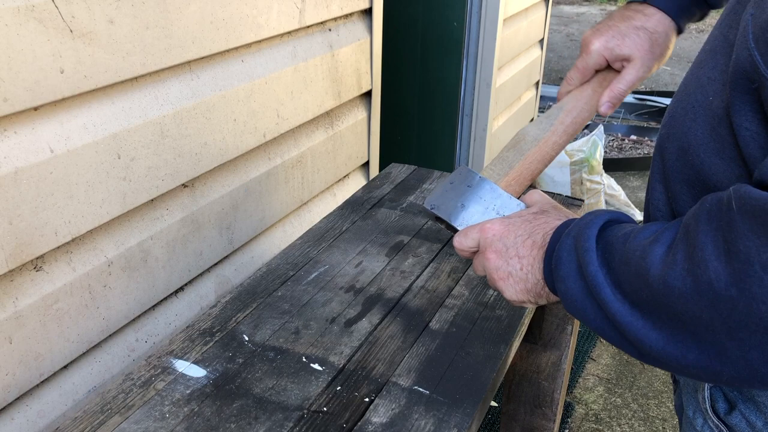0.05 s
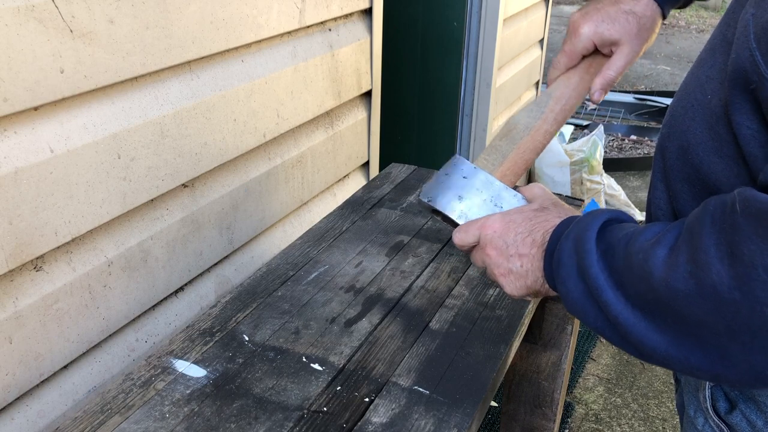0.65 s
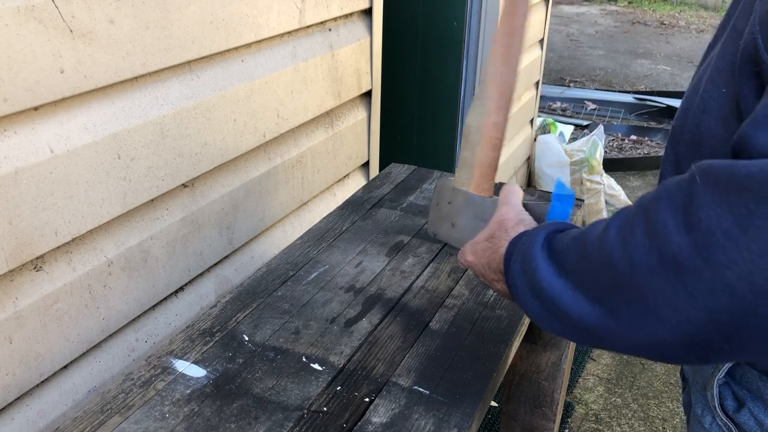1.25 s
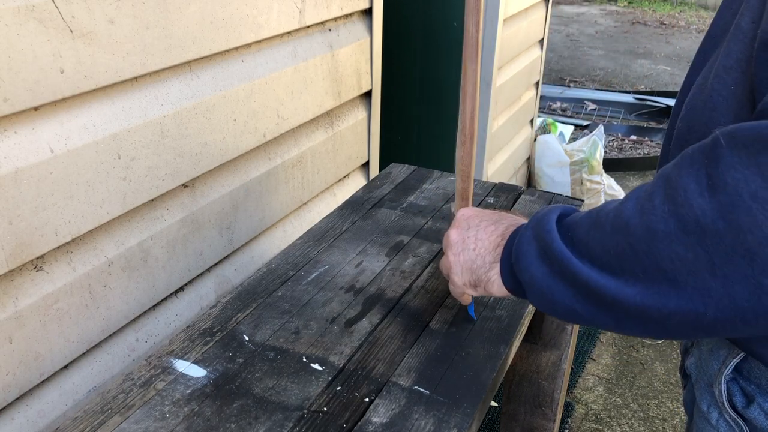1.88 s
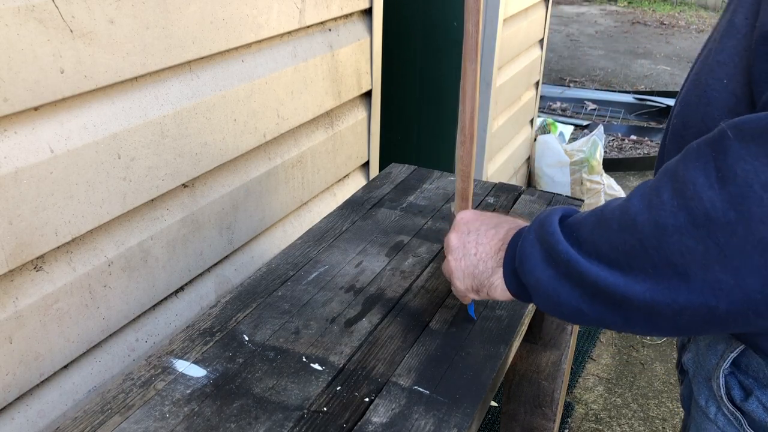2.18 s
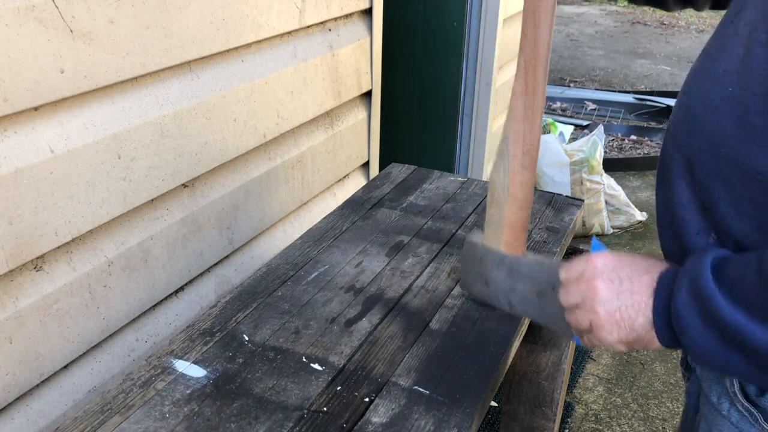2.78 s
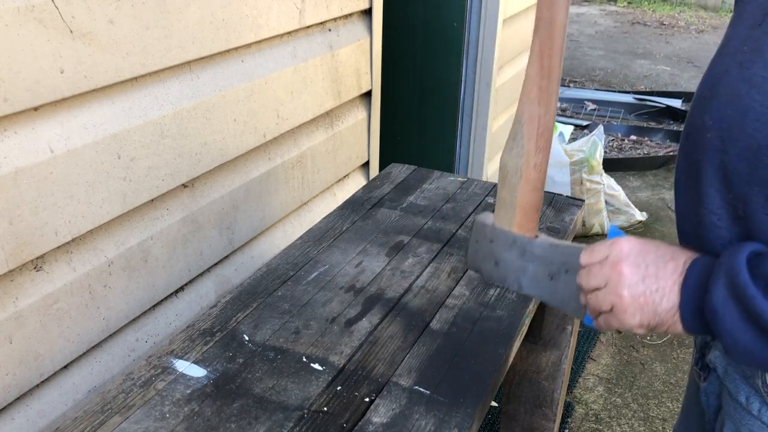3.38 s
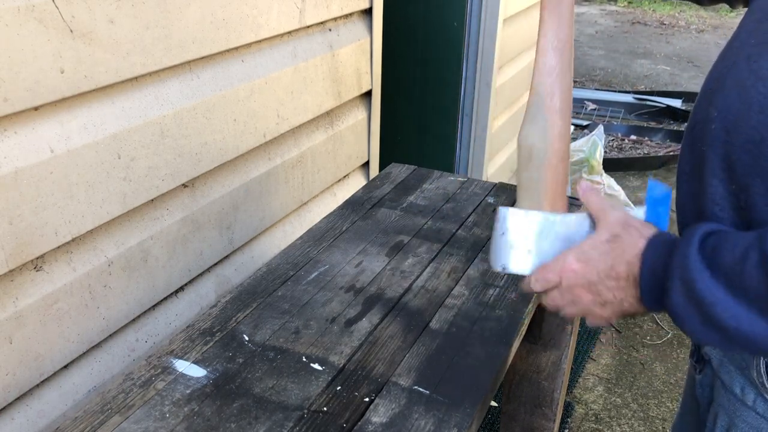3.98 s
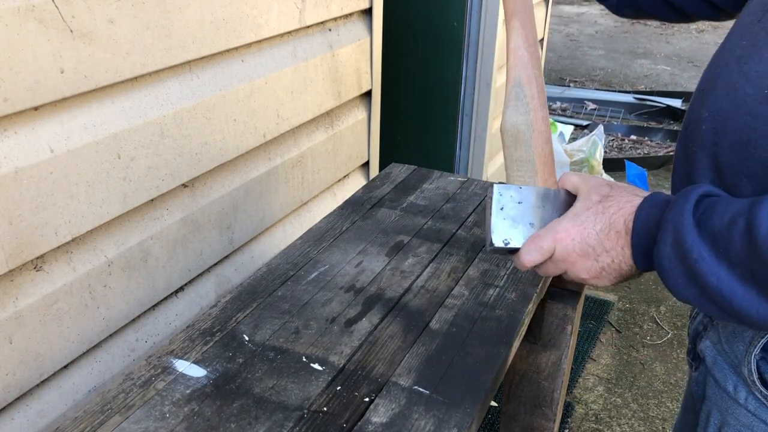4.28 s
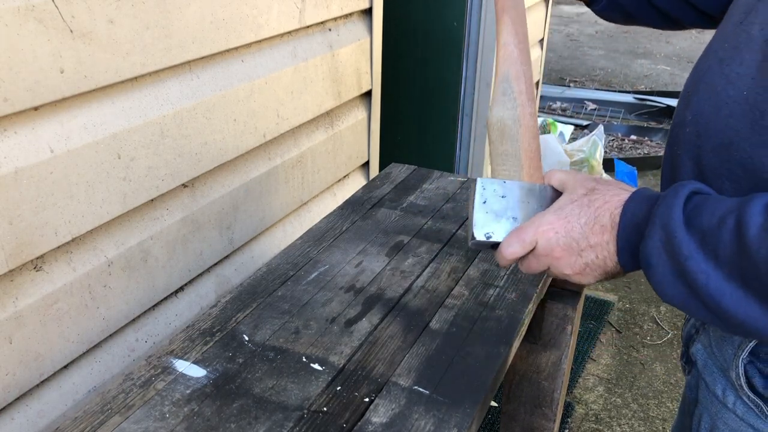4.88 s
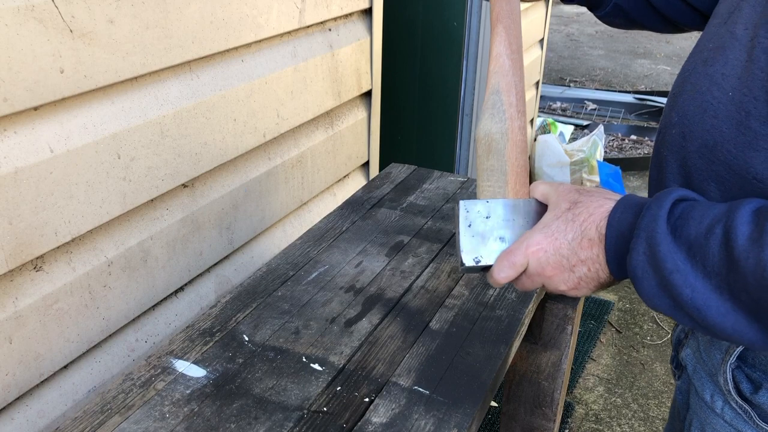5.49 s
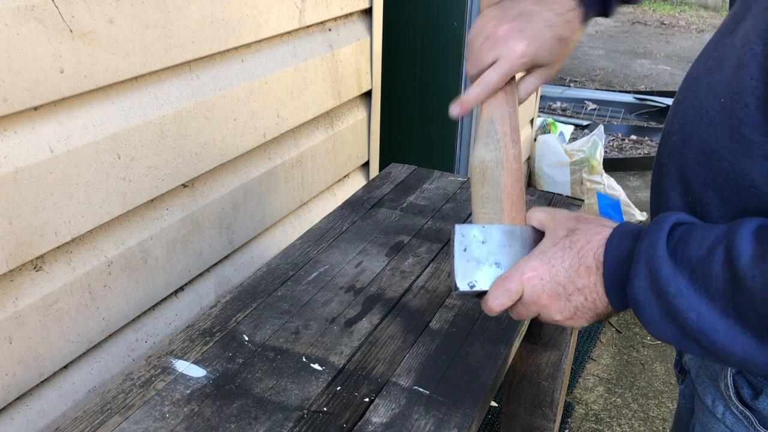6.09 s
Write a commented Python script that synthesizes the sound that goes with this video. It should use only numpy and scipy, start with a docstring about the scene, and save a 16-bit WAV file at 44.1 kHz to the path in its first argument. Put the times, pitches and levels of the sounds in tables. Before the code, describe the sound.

A low, steady hush of outdoor air and very faint, distant birds runs throughout. Close by, a sleeve brushes softly at about 0.7 seconds, and a palm slides on a wooden axe handle with a tiny squeak near 1.3. At 1.6 seconds the steel axe head lands on a plank bench with a dull, hollow thud. A second, slightly brighter knock comes at 2.8 seconds. Two hard, sharp knocks follow at 3.2 and 3.5, each with a quick rattling bounce and small metallic clicks. The knocks are by far the loudest sounds; each makes the wood ring briefly and leaves a short echo from the yard. From 3.8 seconds until the end, just after 6, hands and sleeves rub faintly along the handle, with a few light bumps and ticks between 4.9 and 5.6 and another tiny squeak near 5.1.

```python
"""Axe knocks on a bench

A steel axe head on a wooden handle is knocked four times on a weathered plank bench by a house wall.
Each blow sends a bending wave along the plank, high notes first, and makes the bench ring; the head
bounces and clicks. In between, hands and sleeves rub the handle, over quiet air and a few far birds."""
import sys
import numpy as np
from scipy import signal
from scipy.fft import rfft, irfft
from scipy.io import wavfile
from scipy.ndimage import uniform_filter1d, minimum_filter1d

SR = 44100
rng = np.random.default_rng(int(sys.argv[2]) if len(sys.argv) > 2 else 0)


def wav_out(sig):
    """Save sig, one row per channel (or a flat mono array), as 16-bit PCM at SR to the path in sys.argv[1]."""
    wavfile.write(sys.argv[1], SR, np.round(np.clip(np.atleast_2d(sig).T, -1, 1) * 32767).astype(np.int16))


N = 275625

# the four knocks; sound above hardness_hz is dulled:
# start_s, force_db, hardness_hz, ring_db, scatter_db, spot
BLOWS = [(1.6420, 7, 300, -3, -8, "middle"), (2.8333, 5, 750, 1, -15.5, "outer"),
         (3.2142, 4, 4790, 1, -5, "edge"), (3.4967, 5.5, 4900, 1.5, -2, "corner")]
# the head drops back on the spot last struck: start_s, force_db, ring_db
BOUNCES = [(1.6806, -24, -21.5), (2.8478, -7, -12), (3.2305, 0.5, -8), (3.2390, 1, -13.5),
           (3.2545, -0.5, -8.5), (3.2640, 7.5, -4), (3.5130, 2, 9.5), (3.521, 3.5, -6), (3.5333, 4, 1)]
# the resting head nudges the bench as the grip changes: start_s, force_db
NUDGES = [(4.871, -35.5), (5.068, -35), (5.5553, -45)]
# for each named spot, the travel time of a wave near 1 kHz and the pitch where the plank gives most:
# delay_s, give_hz, give_db, width_octaves
SPOTS = {"middle": (0.00162, 180.6, 18, 0.42), "outer": (0.0017, 330, 2.1, 0.83),
         "edge": (0.00146, 1200, 4.7, 0.078), "corner": (0.001367, 1400, 6.25, 0.21)}
# the bench's own notes and their strength at each spot (fade_s is always the time to drop 60 dB):
# pitch_hz, fade_s, middle_db, outer_db, edge_db, corner_db
BENCH_NOTES = [(79.3, 0.6, -33.5, -52.5, -57, -60), (100.8, 0.074, -88, -59.5, -17, -23.5),
               (131.6, 0.17, -25.5, -39, -34.5, -29), (175.9, 0.15, -18, -24, -27.5, -33.5),
               (190, .12, -60, -26.5, -31.5, -34), (311, 0.15, -34, -21, -24, -29.5),
               (367, 0.15, -27, -37, -21, -34), (438, 0.099, -22, -18.5, -31.5, -27.5),
               (507, 0.27, -39, -36, -29, -31), (463, 0.047, -18, -26, -28.5, -20.5),
               (584, 0.084, -24, -31, -24, -20), (603, 0.16, -65, -28.5, -18, -28.5),
               (685, 0.053, -50, -28.5, -26.5, -20.5), (820, 0.088, -33, -50.5, -36, -43),
               (890, 0.18, -72, -48, -32.5, -31.5), (923.6, .11, -48, -31.5, -34.5, -24),
               (939, 0.21, -45, -39.5, -31, -25.5), (1240, 0.12, -69, -48.5, -36.5, -42),
               (1219, 0.049, -25.5, -45, -38.5, -41), (1310, 0.1, -61, -63.5, -31.5, -37),
               (1395, 0.15, -80, -49.5, -38.5, -37), (1540, 0.086, -71, -55.5, -41.5, -33.5),
               (1530, 0.24, -65, -60.5, -45, -41), (1760, 0.076, -50, -47.5, -42.5, -41.5)]
# tone of the first bending wave: pitch_hz, level_db
WAVE_TONE = [(50, -5.5), (150, 13), (250, 5.5), (350, 21.5), (580, 26), (810, 14), (1000, 22), (1290, 25.5),
             (1600, 16), (2000, 18), (3000, 10.5), (5000, 2.5), (8500, 3.5), (16000, -10.5)]
# the stiff handle's notes, brought out by a hard hit: pitch_hz, level_db, fade_s
HANDLE_NOTES = [(1705, -30, 0.079), (2020, -41.5, .07), (2070, -36.5, 0.099), (2390, -39.5, 0.065),
                (2647, -36, 0.072), (3140, -40.5, 0.093), (3420, -49, 0.12), (3450, -44, 0.22),
                (5170, -47, 0.076)]
# waves scattered by plank ends and joints: pitch_hz, level_db, fade_s
PLANK_ECHOES = [(30.2, 2.5, .2), (58.6, 17.5, 0.19), (116, 16, 0.087), (245, 8, 0.095), (550.5, 24.5, .16),
                (780, 15.5, 0.16), (1320, 22, 0.093), (1950, 10, 0.21), (3070, 1, 0.22), (5000, -2.5, 0.26),
                (8010, 2.5, 0.17), (10840, -4.5, 0.24), (16000, -6.5, 0.22)]
# echoes from the yard: pitch_hz, level_db, fade_s
YARD_ECHOES = [(30, -17.5, .7), (69.67, -3, 1), (250, 0.5, 0.875), (550, 8, 0.62), (1003.5, 12.5, 0.47),
               (1510, 11.5, 0.47), (2120, -4, 0.55), (4005, -13.5, .5), (11990, -26.5, .35)]
# sharp clicks of the steel head: start_s, level_db
CLICKS = [(1.682, -49.5), (2.8585, -43.5), (3.2569, -32.5), (3.2793, -44), (3.3008, -42), (3.5608, -39),
          (3.74, -48.5), (5.1682, -58), (5.556, -50.5)]
# tone of a click: pitch_hz, level_db
CLICK_TONE = [(500, -6), (1800, 5), (4000, -6), (4800, -2), (6000, 0.5), (8500, -8), (10500, -13.5),
              (16000, -20.5)]
# the steel head's own notes: pitch_hz, level_db, fade_s
STEEL_NOTES = [(3530, -20, 0.11), (3750, -20.5, .05), (6030, -16.5, 0.031)]
# a palm slides along the handle: middle_s, length_s, level_db, skin_share (0 all cloth, 1 all skin)
RUBS = [(1.26, 0.29, -69.5, 0.89), (1.886, 0.19, -77.5, 0.94), (2.319, 0.12, -63.5, 0.99),
        (3.791, 0.11, -62.5, 1), (4.225, 0.22, -60, 0.83), (5.68, 0.3, -62, 0.93),
        (6.094, 0.2, -64.5, 0.61)]
# a sleeve brushes past: middle_s, level_db
BRUSHES = [(0.664, -64), (0.781, -63), (4.645, -60), (4.86, -60), (5.07, -62.5), (5.152, -65.5),
           (5.216, -62), (5.4, -69), (5.57, -70.5)]
# bright hiss of skin: pitch_hz, level_db
SKIN_TONE = [(800, -7), (2000, -16.5), (4000, -0.5), (6500, -1), (10000, -2), (15500, -6)]
# dull rustle of cloth: pitch_hz, level_db
CLOTH_TONE = [(300, 1.5), (1000, 1), (1900, 5), (4200, -3), (6500, -9), (10000, -15), (16000, -31)]
# narrow bands that the rubbed axe makes louder: pitch_hz, width_hz, boost_db
RUB_PEAKS = [(1860, 89, -1), (2565, 67, 9), (3257, 64, 11), (4180, 56, 10), (4940, 120, 4.5),
             (5500, 120, 3.5)]
# the palm squeaks on the handle: start_s, length_s, first_hz, last_hz, level_db, wobble_share, octave_db
SQUEAKS = [(1.251, 0.094, 2000, 2870, -62.5, 0.063, -4), (5.074, 0.087, 5480, 5300, -65, 0.095, -24)]
# the clearest far bird notes: start_s, length_s, first_hz, last_hz, level_db
BIRD_NOTES = [(.25, .26, 4390, 4490, -80.5), (1.68, 0.14, 5760, 6260, -74.5),
              (1.884, .2, 4440, 4280, -72.5), (1.919, 0.194, 3440, 3480, -70.5),
              (2.618, 0.094, 5600, 5210, -77), (3.02, 0.16, 5480, 5130, -72),
              (4.72, 0.089, 2820, 2770, -75), (6.08, .15, 3970, 3820, -78)]
# tone of the farthest birds, blurred into a chorus: pitch_hz, level_db
CHORUS_TONE = [(1200, -39.5), (2500, -2), (4000, 0.5), (5500, -4.5), (7000, -10), (9500, -32)]
# how the chorus swells and sinks: time_s, change_db
CHORUS_SWELL = [(0, -1.5), (2.098, 5), (3.1, 4), (4.3, -3.5), (6.25, -10)]
# tone of the outdoor air: pitch_hz, level_db
AIR_TONE = [(22, -33.5), (38, 1), (81, 0), (145, -10.5), (295, -10), (464, -14.5), (645, -12.5),
            (751, -15.5), (919, -13.5), (1100, -16), (3250, -31), (4750, -33), (5820, -35.5),
            (14500, -42.5), (16000, -56.5)]


def knocks(steepness=2.19):
    """Each knock makes a falling chirp in the plank, a clack in the handle, echoes and a ringing bench."""
    out, hz = np.zeros(N), bins(SR)
    clack = rfft(ringing(HANDLE_NOTES, SR))
    fade = np.minimum(np.linspace(10, 0, SR), 1)  # each hit fades out over its last tenth of a second
    chirp = {spot: bending_wave(spot) for spot in SPOTS}
    ring = {spot: bench_ring(spot) for spot in SPOTS}
    for start_s, force_db, hardness_hz, ring_db, scatter_db, spot in knock_list():
        dulling_db = -20 * np.log10(1 + (hz / hardness_hz) ** steepness)  # a soft touch lacks high notes
        push = amp(force_db) * tone_filter(dulling_db)
        scattered = echoes(PLANK_ECHOES, rise_s=0.0014) + echoes(YARD_ECHOES, rise_s=0.017)
        hit = irfft(push * (chirp[spot] + clack + amp(scatter_db) * scattered))
        add(out, start_s, fade * hit + amp(ring_db) * ring[spot])
    return out


def knock_list(bounce_hz=620, pre_echo_hz=1330, nudge_hz=419.6, hard_hz=2500, pre_echo_gap_s=0.0113):
    """Lists every blow, bounce, pre-echo and nudge, in the columns of BLOWS."""
    rows = list(BLOWS)
    for start_s, force_db, ring_db in BOUNCES:
        last_spot = [spot for blow_s, *_, spot in BLOWS if blow_s < start_s][-1]
        rows.append((start_s, force_db, bounce_hz, ring_db, -3, last_spot))
    for start_s, force_db, hardness_hz, _, _, spot in BLOWS:
        if hardness_hz > hard_hz:  # two faint pre-echoes are heard just before each hard knock
            for k in (1, 2):
                rows.append((start_s - k * pre_echo_gap_s, force_db - 29, pre_echo_hz, -np.inf, -4, spot))
    return rows + [(start_s, force_db, nudge_hz, -42.5, -8, "outer") for start_s, force_db in NUDGES]


def bending_wave(spot):
    """The spectrum (the mix of pitches) of the falling chirp that runs straight from the struck spot."""
    delay_s, give_hz, give_db, width_octaves = SPOTS[spot]
    hz = bins(SR)
    boost_db = give_db * np.exp(-(np.log2((hz + 1) / give_hz) / width_octaves) ** 2)
    lag = np.exp(-2j * np.pi * np.cumsum(travel_time(hz, delay_s)))
    return tone_filter(look_up(WAVE_TONE, hz) + boost_db) * lag


def travel_time(hz, delay_s, power=1.06, slowest_hz=110):
    """Seconds a bending wave takes along the plank: the lower the note, the later it arrives."""
    return delay_s * (1e3 / (hz + slowest_hz)) ** power


def bench_ring(spot, build_s=0.0028):
    """The bench rings with its own notes, each as strong as it moves at the struck spot."""
    t, ring = np.arange(SR) / SR, np.zeros(SR)
    for hz, fade_s, *spot_db in BENCH_NOTES:
        age = np.maximum(t - travel_time(hz, SPOTS[spot][0]), 0)
        build = 1 - np.exp(-age / build_s)  # a note needs a trip along the plank to build up
        strength = amp(spot_db[list(SPOTS).index(spot)])
        ring += strength * build * dying(age, fade_s) * np.sin(2 * np.pi * hz * age)
    return ring


def echoes(table, rise_s):
    """The spectrum of one second of crowded echoes that build up, then fade, each pitch at its own pace."""
    hz, t, bands = signal.stft(rng.standard_normal(SR), SR, nperseg=512)
    fade_s = look_up(table, hz, column=2)[:, None]
    energy = fade_s * SR / np.log(1e6)  # evened out below, so a longer fade adds no energy
    tail = signal.istft(bands * dying(t, fade_s) / np.sqrt(energy), SR, nperseg=512)[1][:SR]
    swell = 1 - np.exp(-(np.arange(SR) / SR / rise_s) ** 2)
    return rfft(tail * swell) * tone_filter(look_up(table, bins(SR)))


def clicks(snap_s=0.0012, after_db=-17, after_s=0.0091, grit_delay_s=0.005, grit_db=-41.5):
    """The steel head clicks, and crushes grit at each blow; the hand keeps its ring short."""
    out, t = np.zeros(N), np.arange(SR // 8) / SR
    ring = ringing(STEEL_NOTES, len(t))
    snap_shape = np.exp(-t / snap_s) + amp(after_db) * np.exp(-t / after_s)
    grit = [(blow[0] + grit_delay_s, grit_db) for blow in BLOWS]
    for start_s, level_db in CLICKS + grit:
        snap = noise(CLICK_TONE, len(t)) * snap_shape
        add(out, start_s, amp(level_db) * (snap + ring))
    return out


def rubs(grain_db=2.0, shuffle_db=5.5):
    """Palms slide and sleeves brush on the handle; they catch unevenly and the axe shapes the tone."""
    t, hz = np.arange(N) / SR, bins(N)
    skin, cloth = noise(SKIN_TONE, N), noise(CLOTH_TONE, N)

    def stroke(middle_s, length_s, level_db, skin_share):
        """One smooth swell of rubbing, part skin and part cloth."""
        swell = np.exp(-abs(3.3 * (t - middle_s) / length_s) ** 3)
        return amp(level_db) * swell * (np.sqrt(skin_share) * skin + np.sqrt(1 - skin_share) * cloth)

    out = sum(stroke(*row) for row in RUBS)
    out += sum(stroke(middle_s, length_s=0.08, level_db=db, skin_share=0.047) for middle_s, db in BRUSHES)
    shuffle = amp(shuffle_db * wander(N, span=4000))  # fingers shift faintly as the axe is turned over
    out += shuffle * stroke(middle_s=1.47, length_s=2.4, level_db=-79, skin_share=0.86)
    catches = unit(amp(grain_db * wander(N, span=130)))
    boost_db = sum(db / (1 + (2 * (hz - peak_hz) / width_hz) ** 2) for peak_hz, width_hz, db in RUB_PEAKS)
    return irfft(rfft(out * catches) * amp(boost_db), N)


def squeaks():
    """Skin sticks and slips on the handle, making short, rough notes that slide in pitch."""
    out = np.zeros(N)
    for start_s, length_s, first_hz, last_hz, level_db, wobble_share, octave_db in SQUEAKS:
        phase = glide(length_s, first_hz, last_hz, wobble_share, span=40)
        squeak = np.sin(phase) + amp(octave_db) * np.sin(2 * phase)
        add(out, start_s, amp(level_db) * squeak * signal.windows.tukey(len(phase), 0.5))
    return out


def birds(echo_fade_s=0.65):
    """Far birds whistle wavering notes, heard mostly through their echoes."""
    whistles, t = np.zeros(N), np.arange(SR // 2) / SR
    for start_s, length_s, first_hz, last_hz, level_db in BIRD_NOTES + faint_notes():
        phase = glide(length_s, first_hz, last_hz, wobble_share=0.018, span=400)
        add(whistles, start_s, amp(level_db) * np.sin(phase) * signal.windows.tukey(len(phase), 0.7))
    tail = rng.standard_normal(len(t)) * dying(t, echo_fade_s)
    return 0.5 * whistles + 1.5 * signal.oaconvolve(whistles, tail / np.linalg.norm(tail))[:N]


def faint_notes(count=10, low_hz=3590, high_hz=7200, length_s=0.15, sag_share=0.05, level_db=-85):
    """Lists fainter bird notes at random times and pitches, each sagging a little in pitch."""
    when, height = rng.random((count, 2)).T
    starts = (np.arange(count) + when) / count * N / SR
    pitches = low_hz * (high_hz / low_hz) ** height
    return [(start_s, length_s, hz, hz * (1 - sag_share), level_db) for start_s, hz in zip(starts, pitches)]


def bird_chorus(level_db=-80, patchy_db=4.0):
    """The farthest birds blur into a high, patchy hiss that swells and sinks."""
    bands = signal.stft(noise(CHORUS_TONE, N), SR, nperseg=1024)[2]
    patches = uniform_filter1d(rng.standard_normal(bands.shape), size=5, axis=0)  # smooth across pitch
    patches = unit(uniform_filter1d(patches, size=14, axis=1))  # then across time
    blur = unit(signal.istft(bands * amp(patchy_db * patches), SR, nperseg=1024)[1][:N])
    swell_db = np.interp(np.arange(N) / SR, *np.transpose(CHORUS_SWELL))
    return blur * amp(level_db + swell_db)


def air(level_db=-63.5):
    """The steady, low hush of outdoor air."""
    return noise(AIR_TONE, N) * amp(level_db)


def amp(db):
    """Turns decibels into a number to multiply by."""
    return 10 ** (np.asarray(db) / 20)


def unit(x):
    """Scales a signal to an average strength (rms) of 1."""
    return x / np.sqrt(np.mean(x ** 2) + 1e-20)


def look_up(table, hz, column=1):
    """Reads a table at any pitch, filling in smoothly between its rows."""
    columns = np.transpose(table)
    return np.interp(np.log(hz + 1), np.log(columns[0]), columns[column])


def add(mix, start_s, sound):
    """Mixes a sound in at its start time."""
    part = mix[max(round(start_s * SR), 0):][:len(sound)]
    part += sound[:len(part)]


def bins(size):
    """The pitches, in Hz, in the spectrum of that many samples."""
    return np.fft.rfftfreq(size, 1 / SR)


def tone_filter(db):
    """A filter with these levels that lets nothing sound before the blow (minimum phase)."""
    log_gain = np.log(amp(np.r_[db, db[-2:0:-1]]))
    return np.exp(np.conj(signal.hilbert(log_gain)))[:len(db)]


def noise(tone, size):
    """Noise of strength 1, shaped by a tone table."""
    return unit(irfft(rfft(rng.standard_normal(size)) * amp(look_up(tone, bins(size))), size))


def wander(size, span):
    """A random drift of strength 1, smoothed over span samples."""
    return unit(uniform_filter1d(rng.standard_normal(size), size=span))


def glide(length_s, first_hz, last_hz, wobble_share, span):
    """The phase (running angle) of a note that wobbles as it slides from one pitch to another."""
    size = int(length_s * SR)
    wobble = 1 + wobble_share * wander(SR, span)[:size]
    return 2 * np.pi * np.cumsum(np.linspace(first_hz, last_hz, size) * wobble) / SR


def dying(t, fade_s):
    """A fade that drops 60 dB every fade_s seconds."""
    return np.exp(-np.log(1000) * t / fade_s)


def ringing(notes, size):
    """A struck object's own notes, each fading at its own pace."""
    t = np.arange(size) / SR
    return sum(amp(db) * dying(t, fade_s) * np.sin(2 * np.pi * hz * t) for hz, db, fade_s in notes)


def limiter(x, ceiling_db=-6.6, recovery_s=1):
    """Turns everything down at once when a peak passes the ceiling, then slowly back up."""
    peak = -minimum_filter1d(-abs(x[0]), size=300)
    over_db = np.maximum(20 * np.log10(peak + 1e-9) - ceiling_db, 0)
    recovery = np.exp(-np.arange(N) / SR / recovery_s)
    held_db = np.maximum.accumulate(over_db / recovery) * recovery
    return x * amp(-uniform_filter1d(held_db, size=150))


def scene():
    """All the sounds together in one channel."""
    return (knocks() + clicks() + rubs() + squeaks() + birds() + bird_chorus() + air())[None]


def record(dry, low_cut_hz=38, high_cut_hz=15900):
    """Cuts the deepest rumble, holds down loud peaks and trims the very highest pitches."""
    thinned = signal.sosfilt(signal.butter(2, low_cut_hz, "highpass", fs=SR, output="sos"), dry)
    high_cut = signal.firwin(511, high_cut_hz, window=("kaiser", 9), fs=SR)
    return signal.oaconvolve(limiter(thinned), high_cut[None], "same")


dry = scene()
out = record(dry)
wav_out(out)
```